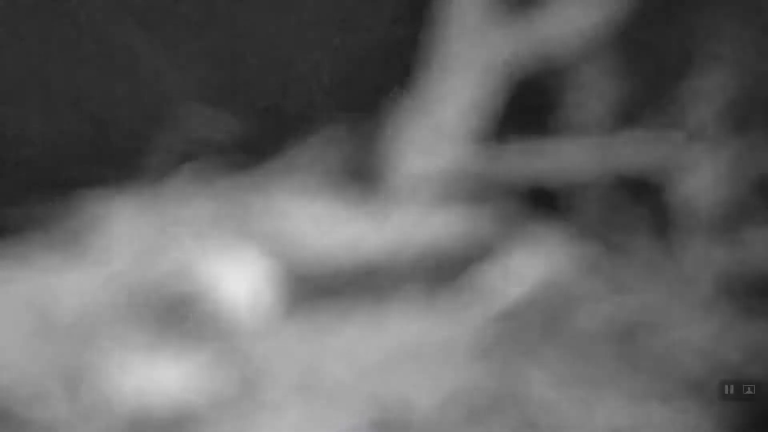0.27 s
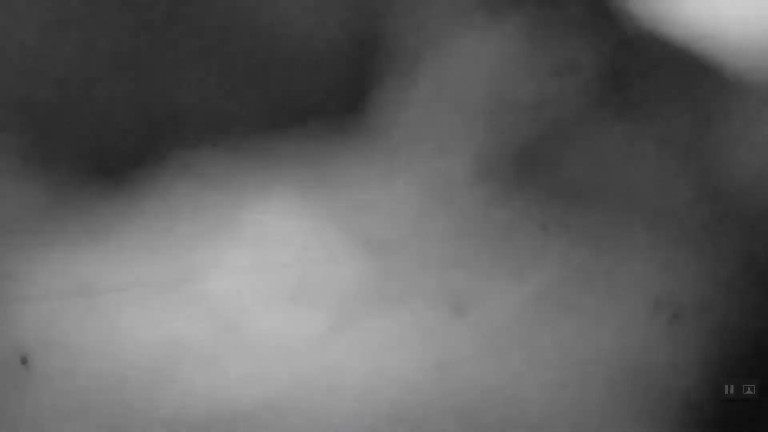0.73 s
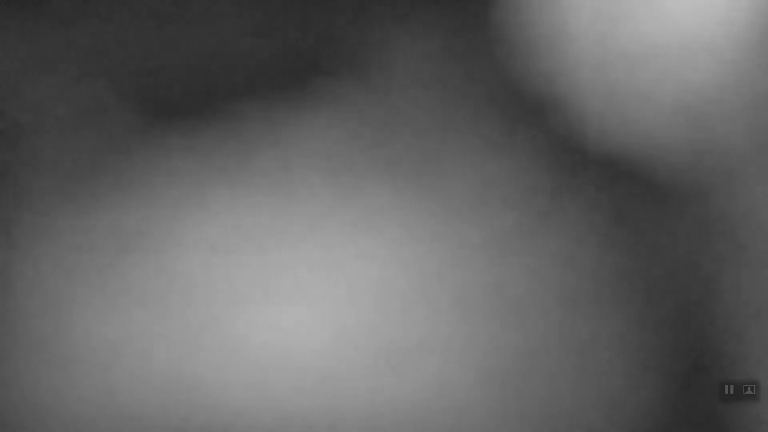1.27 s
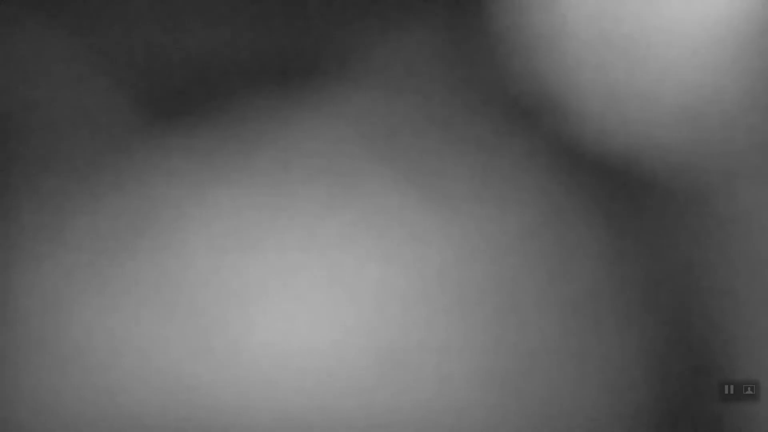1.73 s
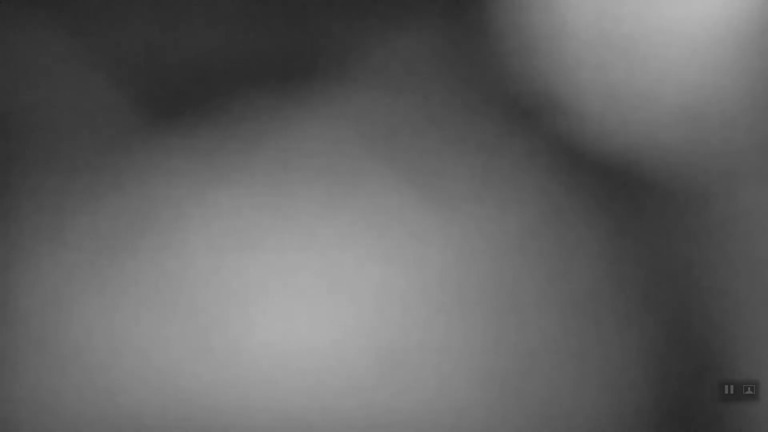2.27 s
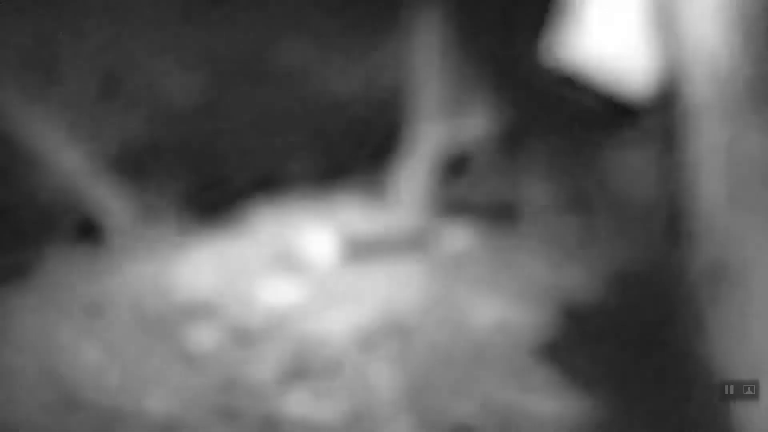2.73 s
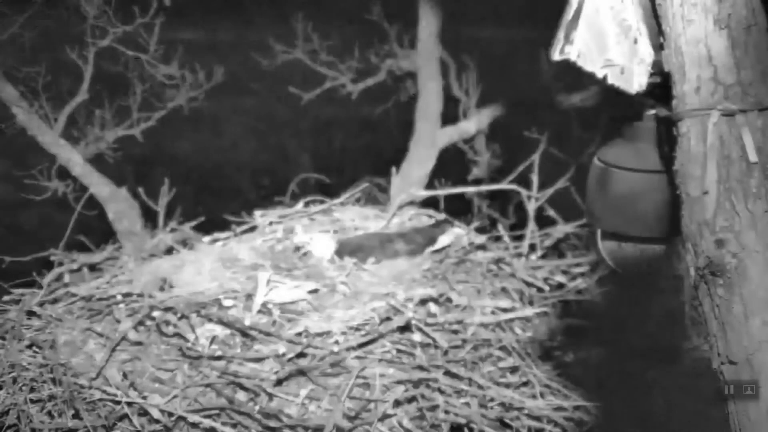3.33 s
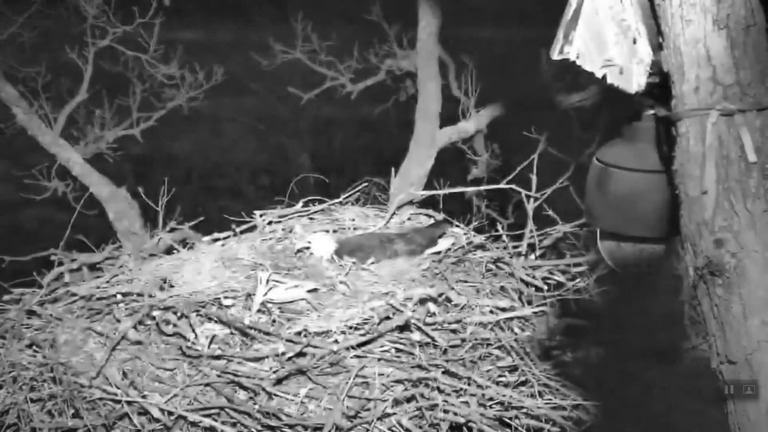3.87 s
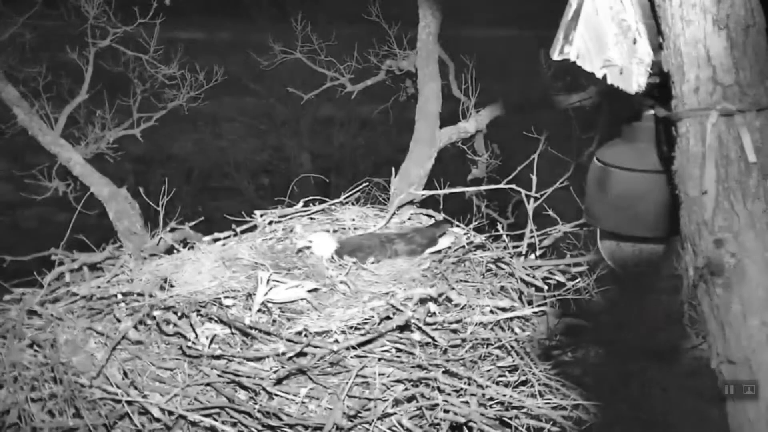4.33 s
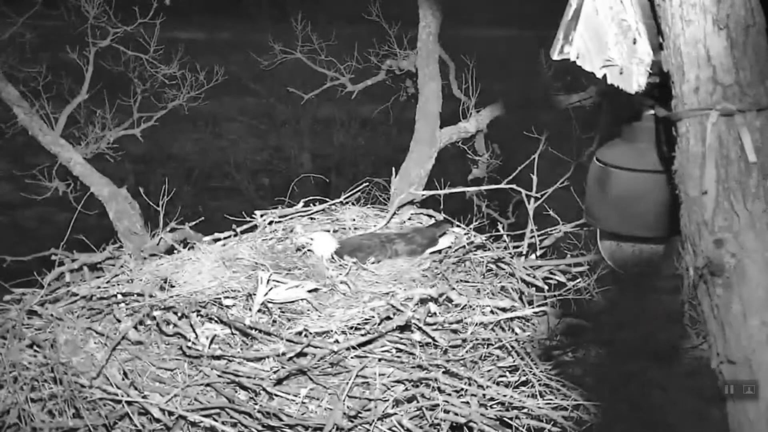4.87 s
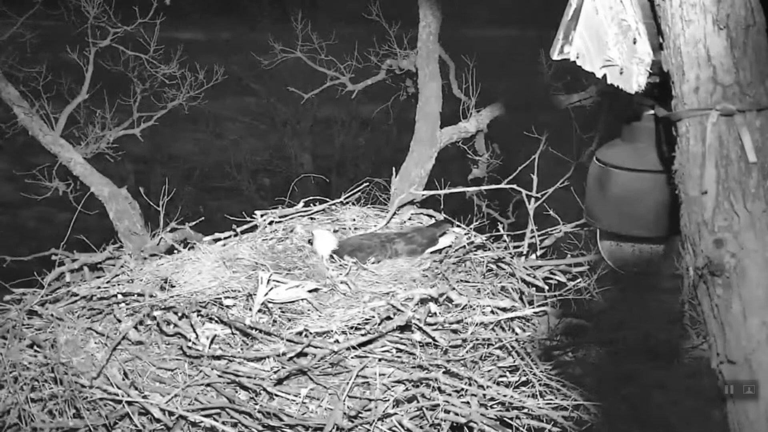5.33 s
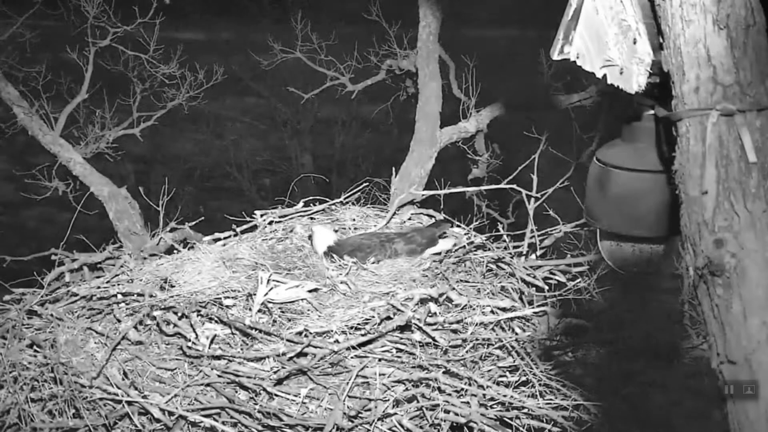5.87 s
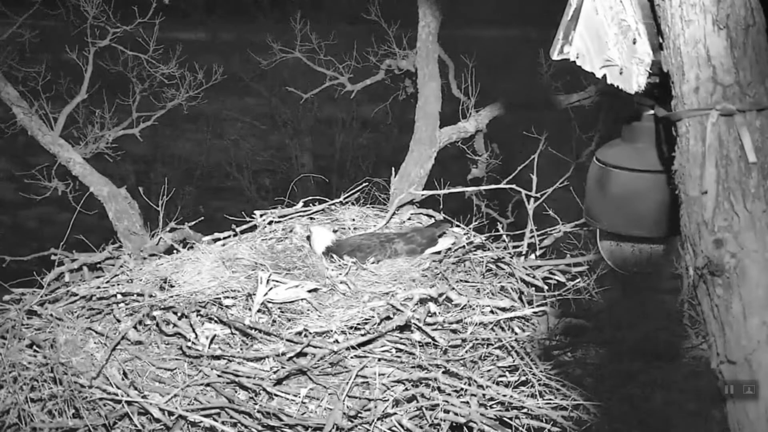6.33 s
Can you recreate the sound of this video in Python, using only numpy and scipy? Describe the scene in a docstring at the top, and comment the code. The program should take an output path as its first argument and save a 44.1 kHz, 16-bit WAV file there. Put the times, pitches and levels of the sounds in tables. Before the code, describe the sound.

A bald eagle squeals hoarsely and gives two bouts of rapid high chittering at night, over a low throbbing hum.

```python
"""Hoarse squeals, then two bouts of rapid notes that sink and fade: an eagle chitters at night near a nest camera.
Most notes are a short falling squeak that breaks into a held, reedy tone, built from shaky harmonics and airy noise.
Faint whistles are pure gliding tones; nest knocks and higher beak or throat clicks are dying rings with a crack.
The trees echo the calls through a few delays and a scattered tail.
Under it all a low machine hum throbs, made of steady tones, over a soft rumble and microphone hiss of shaped noise."""
import sys
import numpy as np
from scipy import signal
from scipy.fft import rfft, irfft
from scipy.io import wavfile
from scipy.ndimage import map_coordinates

SR = 44100
rng = np.random.default_rng(int(sys.argv[2]) if len(sys.argv) > 2 else 0)


def to_wav(sig):
    """Store sig (one row per channel, or 1-D mono) as 16-bit WAV at the path in sys.argv[1].

    Samples outside -1..1 are clipped; the rate is SR.
    """
    pcm = np.clip(np.atleast_2d(sig), -1, 1) * 32767
    pcm = np.round(pcm).astype(np.int16)
    wavfile.write(sys.argv[1], SR, pcm.T)  # frames by channels


N = 291501  # length of the scene in samples

CHITTER_ARCH = .022  # both ends of a held note lie this share of its pitch below the middle


def eagle():
    """All the bird's calls, each sung by the syrinx, its voice organ."""
    return squeals() + chitters() + double_notes() + short_calls()


def chitters():
    """Each note drops in with a squeak and settles on a held, reedy tone."""
    # held notes: (start t/s, length t/s, attack t/s, pitch f/Hz, fall as a share of pitch, level/dB,
    # fade in dB per s, 2nd harmonic level/dB, 3rd harmonic level/dB, squeak level/dB)
    held_notes = [ (3.005, .060, .018, 3025, -.004, -25, 140, -18, -11, -58),
                  (3.231, 0.052, .0045, 3025, .05, -26.3, 15, -10.5, -14.5, -35.5),
                  (3.354, .042, .005, 3015, 0.031, -26.7, 15, -9.5, -21, -37.5),
                  (3.490, .036, .005, 2925, 0.048, -31, 70, -6.5, -26, -49),
                  (3.798, .016, .005, 2015, 0.054, -34, 20, -9, -24, -66),
                  (5.900, .037, .005, 2740, 0.021, -44, -60, -1, -7.5, -49.5),
                  (6.022, 0.03, .005, 2680, 0.0056, -45, 200, 0.5, -13, -61),
                  (6.155, .040, .010, 2640, 0.035, -61.5, 20, -11, -13, -65.5)]
    squeak_lead_s = .0105
    out = np.zeros(N)
    for start, length, attack, hz, fall, db, fade, second_db, third_db, squeak_db in held_notes:
        add(out, start - squeak_lead_s, undb(squeak_db) * squeak(hz))
        held = note(length, hz, fall, CHITTER_ARCH, second_db, third_db, roughness(db),
                    fade_db_per_s=fade, attack=attack)
        add(out, start, undb(db) * held)
    return out


def double_notes():
    """After the squeak a high voice sounds and a low one joins; together they make tones at sums of their pitches."""
    # notes sung on both sides of the syrinx: (start t/s, length t/s, low voice f/Hz, fall as a share of pitch,
    # low voice level/dB, high voice f/Hz, high voice length t/s, high voice level/dB,
    # 2nd harmonic level/dB, sum tone level/dB, squeak level/dB)
    voice_pairs = [ (3.113, 0.051, 3070, 0.065, -25, 3723, .012, -23, -11, -41, -33.5),
                   (3.630, 0.041, 2090, .16, -33.5, 2785, 0.012, -37.5, -14.5, -48, -40.5),
                   (5.455, 0.054, 2960, 0.014, -47, 3490, .048, -40.5, -7, -38.5, -66),
                   (5.556, 0.05, 2900, 0.017, -54, 3535, .046, -32, -4.5, -50, -37.5),
                   (5.665, 0.072, 2790, .04, -54.5, 3533, .037, -31.5, -8, -47, -40.5),
                   (5.777, 0.056, 2825, 0.037, -44, 3400, 0.018, -44.5, 0.5, -45, -45)]
    squeak_lead_s, low_lag_s = .0125, .0055  # the low voice joins late
    high_fall, high_rough = .01, .36  # share of pitch; roughness
    first_pulse_gap_s, pulse_gap_every_s, gap_depth = .016, .0214, .83
    upper_sum_db = -10  # upper sum tones, relative to the first
    out = np.zeros(N)
    for (start, length, low_hz, fall, low_db, high_hz, high_s, high_db,
         second_db, sum_db, squeak_db) in voice_pairs:
        third_db = second_db - 5.5
        low = note(length - low_lag_s, low_hz, fall, CHITTER_ARCH, second_db, third_db,
                   roughness(low_db), fade_db_per_s=15)
        high = note(high_s, high_hz, high_fall, 0, second_db, third_db=-18, rough=high_rough,
                    tremor_db=2.0, fade_db_per_s=5)
        both = note(high_s, low_hz + high_hz, high_fall, 0, second_db=-22, third_db=-30, rough=.4,
                    fade_db_per_s=150)
        for hz in (2 * low_hz + high_hz, low_hz + 2 * high_hz):
            upper = note(high_s, hz, high_fall, 0, second_db=-30, third_db=-30.5, rough=.4)
            both = both + undb(upper_sum_db) * upper
        add(out, start - squeak_lead_s, undb(squeak_db) * squeak(high_hz))
        # narrow dips break the high voice and the sum tones into short pulses
        t = np.arange(len(high)) / SR
        dips = np.cos(np.pi * (t - first_pulse_gap_s) / pulse_gap_every_s) ** 10
        chop = 1 - gap_depth * dips
        add(out, start, chop * (undb(high_db) * high + undb(sum_db) * both))
        add(out, start + low_lag_s, undb(low_db) * low)
    return out


def squeak(pitch):
    """The rough, steep drop into a note; its own pitch partly follows the pitch of that note."""
    usual_squeak_hz, usual_note_hz, follow = 4480, 3000, .6
    squeak_hz = usual_squeak_hz * (pitch / usual_note_hz) ** follow
    return note(.013, squeak_hz, fall=.35, arch=.02, second_db=-20.5, third_db=-25, rough=1.07)


def squeals():
    """A hoarse rising tone breaks into a higher, harsher one that sinks and fades."""
    # (start t/s, length t/s, pitch f/Hz, level/dB, break after t/s, length after the break t/s,
    # level after the break/dB)
    squeal_list = [(0.038, 0.0406, 4660, -40, .055, .080, -43.5),
                   (.358, .042, 4780, -45.5, .022, .055, -55)]
    rise, break_ratio, break_fall = .06, 1.295, .075  # rise and fall are shares of pitch
    scrape_s, scrape_ratio, scrape_db = .034, .85, -10.5  # rough, lower end of the first tone
    out = np.zeros(N)
    for start, length, hz, db, break_s, harsh_s, harsh_db in squeal_list:
        first = note(length, hz, -rise, arch=0.016, second_db=-24, third_db=-26, rough=.48, attack=.009)
        add(out, start, undb(db) * first)
        harsh = note(harsh_s, break_ratio * hz, break_fall, arch=0.014, second_db=-15, third_db=-25,
                     rough=.75, fade_db_per_s=80)
        add(out, start + break_s, undb(harsh_db) * harsh)
        scrape = note(scrape_s, scrape_ratio * hz, 0, 0, second_db=-8, third_db=-16, rough=1.32)
        add(out, start + length, undb(db + scrape_db) * scrape)
    return out


def short_calls():
    """Brief rising or arched yelps early in a bout, falling high chips and low clucks, all syrinx notes."""
    # yelps: (start t/s, length t/s, pitch f/Hz, rise as a share of pitch, level/dB,
    # 2nd harmonic level/dB, roughness 0-1)
    yelp_list = [(2.986, 0.021, 4140, .03, -33.5, -19, 0.23), (3.071, .012, 4600, .22, -36, -12, 0.7),
                 (5.433, .026, 3690, .09, -48.5, -14, 0.63), (5.510, 0.0157, 4750, 0.2, -41, -6, 0.8)]
    # chips: (start t/s, length t/s, pitch f/Hz, level/dB)
    chip_list = [(1.775, .025, 3900, -55.5), (1.778, 0.025, 4640, -61), (1.886, 0.011, 4550, -47),
                 (1.893, .009, 3940, -48), (1.901, 0.013, 3895, -38.5), (2.025, .009, 3700, -61),
                 (3.737, .014, 4400, -40), (3.749, 0.013, 3820, -38), (3.865, 0.012, 4270, -56)]
    # clucks: (start t/s, length t/s, pitch f/Hz, level/dB, 2nd harmonic level/dB, 3rd harmonic level/dB)
    cluck_list = [(0.055, 0.018, 1810, -48, -22, -29), (.061, 0.022, 1273, -44.5, -5, -2.5),
                  (0.092, .040, 815, -40.5, -27, -10), (3.516, .019, 2040, -45, -19, -21),
                  (3.973, .023, 1284, -48.5, 0.5, -14), (4.127, 0.0247, 1188, -49, -2, -24),
                  (4.447, 0.014, 1660, -55, -24, -26), (6.308, .008, 2380, -67, 1, -12)]
    out = np.zeros(N)
    for start, length, hz, rise, db, second_db, rough in yelp_list:
        yelp = note(length, hz, -rise, arch=.11, second_db=second_db, third_db=-25, rough=rough)
        add(out, start, undb(db) * yelp)
    for start, length, hz, db in chip_list:
        chip = note(length, hz, fall=.065, arch=0, second_db=-23.5, third_db=-30, rough=.4)
        add(out, start, undb(db) * chip)
    for start, length, hz, db, second_db, third_db in cluck_list:
        cluck = note(length, hz, fall=.145, arch=0, second_db=second_db, third_db=third_db, rough=.56)
        add(out, start, undb(db) * cluck)
    return out


def roughness(db):
    """The less force behind a note, the less steadily the syrinx vibrates."""
    loud_rough, rough_per_db, loud_db = .21, .012, -25.5
    return np.clip(loud_rough + rough_per_db * (loud_db - db), .05, 1)


def note(length, pitch, fall, arch, second_db, third_db, rough, side_ratio=1.3, coupling=0.087,
         tremor_hz=56, tremor_db=1.0, tremor_lag=.0025, follow=.45, fade_db_per_s=40, dulling=1.6,
         attack=.0053, waver=.003):
    """One syrinx note: a harmonic tone whose pitch and strength shake with roughness, with a rasp of air."""
    # colour of the airy noise: (f/Hz, relative level/dB)
    rasp_shape = [(500, -3), (1500, -6.5), (3000, -2), (5500, -11.5), (8000, -5.5), (12000, -10.5),
                  (16000, -22)]
    t, hz, envelope = glide(length, pitch, fall, arch, attack=attack, release=min(.009, 0.3 * length))
    rough_jitter = rough ** 1.45 * (.06 * wobble(t, 1496) + .014 * wobble(t, 220))
    jitter = rough_jitter + waver * wobble(t, 70)
    phase = 2 * np.pi * np.cumsum(hz * (1 + jitter)) / SR
    # the other side of the syrinx buzzes at 1.3 times the pitch and bends the wave: out-of-tune side tones
    side = side_ratio * phase + rng.uniform(0, 2 * np.pi)
    buzz = sum(np.sin(k * side) / k for k in range(1, 4))
    phase = phase + coupling * undb(3.3 * wobble(t, 110)) * buzz
    # the air pressure trembles, which the overtones follow far more than the fundamental
    tremor = tremor_db * np.sin(2 * np.pi * tremor_hz * (t - tremor_lag))
    # as the pressure runs out the note weakens, and its high overtones give way to the 2nd
    fade = fade_db_per_s * (t - length / 2)
    envelope = envelope * undb(-fade)
    dull = dulling * fade
    upper_db = -22.5 + 0.21 * (second_db + third_db)  # 4th and 5th harmonics
    tone = undb(1.1 * wobble(t, 131.5) + follow * tremor) * np.sin(phase)
    for k, db in enumerate([second_db, third_db, upper_db, upper_db], start=2):
        tilt = dull if k == 2 else -dull
        strength = undb(db + tremor + tilt + 3.02 * wobble(t, 130))
        below_limit = k * hz < SR / 2  # leave out pitches too high for the sample rate
        tone += strength * np.sin(k * phase) * below_limit
    shake = 1 + rough * (0.4 * wobble(t, 498) + 0.22 * wobble(t, 2400))
    # the air leaves in tiny uneven spurts
    spurts = undb(3 * wobble(t, 700))
    rasp = (undb(-37) + rough * undb(-16)) * spurts * noise(rasp_shape, size=8192)[:len(t)]
    return envelope * (tone * shake + rasp)


def glide(length, pitch, fall, arch, attack, release):
    """Time, falling arched pitch and soft-edged envelope of one note."""
    t = np.arange(int(length * SR)) / SR
    u = t / length - .5  # from -0.5 at the start to 0.5 at the end
    hz = pitch * (1 - fall * u - arch * (2 * u) ** 2)
    edges = np.clip(t / attack, 0, 1) * np.clip((length - t) / release, 0, 1)
    return t, hz, np.sin(np.pi / 2 * edges) ** 2


def whistles():
    """Thin, faint slurs: single gliding sine waves with soft edges."""
    # (start t/s, length t/s, pitch f/Hz, fall as a share of pitch, peak level/dB)
    whistle_list = [(.785, .035, 4580, 0.042, -78), (1.344, 0.068, 4400, 0.069, -68.5),
                    (2.076, 0.06, 4300, .09, -69), (4.76, 0.021, 4570, .055, -68.5),
                    (4.782, .098, 4190, -.035, -73)]
    out = np.zeros(N)
    for start, length, pitch, fall, db in whistle_list:
        t, hz, envelope = glide(length, pitch, fall, arch=-.01, attack=.008, release=0.01)
        tone = np.sin(2 * np.pi * np.cumsum(hz) / SR)
        add(out, start, undb(db) * envelope * tone)
    return out


def knocks_and_clicks(crack_t60=0.12, contact=0.0028):
    """Nest knocks, some bouncing in a rattle, and higher beak or throat clicks: damped rings under a brief crack."""
    # (start t/s, thud level/dB, crack level/dB, ring pitch ratio, rattle length t/s)
    knock_list = [(.185, -27.5, -44, 0.836, .005), (0.447, -26.5, -41.5, 0.92, .015),
                  (1.877, -38.5, -44, 2.32, 0.013), (2.020, -44.5, -47, 2, .005),
                  (3.101, -36.5, -39.5, 1.64, .005), (3.433, -29.5, -50, 1.05, .064),
                  (3.613, -41.5, -55, 2.1, .005), (3.732, -43, -55, 2.33, .005),
                  (3.857, -41.5, -54, 2.05, .005), (5.545, -32, -41, 1.28, .005)]
    # ring of the nest, pitched up for the clicks: (f/Hz before the pitch ratio, level/dB,
    # time to fall by 60 dB t/s)
    nest_modes = [(155.7, -3.5, 0.14), (259, 4.5, 0.043), (342, 3, 0.024), (520, 1.5, 0.022),
                  (750, -11, 0.0196)]
    # colour of the crack: (f/Hz, relative level/dB)
    crack_shape = [(300, 8.5), (1200, -8.5), (2500, -14), (6000, -34), (16000, -21)]
    bounce_s, rattle_fade_db = .0131, 11.5  # gap between bounces; loss by the end of a rattle
    out = np.zeros(N)
    t = np.arange(SR // 10) / SR
    push = np.clip(t / contact, 0, 1)  # the blow builds up softly, as when a springy nest gives way
    for start, thud_db, crack_db, ratio, rattle_s in knock_list:
        for delay in np.arange(0, rattle_s, bounce_s):
            detune = ratio * (1 + 0.092 * rng.standard_normal(len(nest_modes)))
            thud = np.zeros(len(t))
            for (hz, db, t60), pitch_ratio in zip(nest_modes, detune):
                thud += undb(db - 60 * t / t60) * np.sin(2 * np.pi * hz * pitch_ratio * t)
            crack = noise(crack_shape, len(t)) * np.exp(-np.log(1000) * t / crack_t60)
            strength = undb(-rattle_fade_db * (delay / rattle_s) ** 2)
            knock = undb(thud_db) * thud + undb(crack_db) * crack
            add(out, start + delay, strength * push * knock)
    return out


def trees(x, wet_db=-18, t60=0.85, low_hz=4300, high_hz=8500, flicker_db=3, flicker_rate=45,
          sway_s=.00003, sway_rate=25):
    """Close reflections, then a thin scatter from the branches, mostly of short waves; the tail flickers as it dies."""
    # near reflections from trunk and nest, ahead of the final filter: (delay t/s, level/dB)
    echo_list = [(0.011, -16), (0.019, -10.5), (.036, -18), (.088, -42)]
    t = np.arange(SR // 2) / SR
    decay = np.exp(-np.log(1000) * t / t60)
    scatter = rng.standard_normal(len(t)) ** 3 * decay * np.clip(t / .015, 0, 1)  # cubing makes it sparse
    tail = signal.fftconvolve(x, undb(wet_db) * scatter / np.linalg.norm(scatter))[:N]
    now = np.arange(N) / SR
    swaying_time = now + sway_s * wobble(now, sway_rate)
    out = map_coordinates(tail, [swaying_time * SR]) * undb(flicker_db * wobble(now, flicker_rate))
    for delay, db in echo_list:
        add(out, delay, undb(db) * x)
    return signal.sosfilt(signal.butter(1, [low_hz, high_hz], "bandpass", fs=SR, output="sos"), out)


def background(night_db=-45.0, sway_db=0.2):
    """Steady machine tones over a gently swaying rumble and even hiss; the upper two beat about 8 times a second."""
    # pitches of the hum tones: (f/Hz)
    hum_pitches = (71.5, 95.87, 103.71)
    # peaks of the same tones: (level/dB)
    hum_levels = (-56.5, -35.5, -44.5)
    # colour of the rumble and hiss: (f/Hz, relative level/dB)
    night_shape = [(25, -10), (65, 3.5), (130, 1.5), (250, -1), (450, -2.5), (700, -11), (1100, -22),
                   (1800, -37.5), (3000, -41.5), (5000, -43), (8000, -39), (11000, -36), (16000, -37)]
    t = np.arange(N) / SR
    hum = sum(undb(db) * np.sin(2 * np.pi * hz * t) for hz, db in zip(hum_pitches, hum_levels))
    air = noise(night_shape, N)
    rumble = signal.sosfilt(signal.butter(1, 1200, fs=SR, output="sos"), air)
    sway = undb(sway_db * wobble(t, 11)) - 1
    return hum + undb(night_db) * (air + rumble * sway)


def undb(db):
    """Decibels to gain."""
    return 10 ** (np.asarray(db) / 20)


def noise(points, size):
    """Unit-rms noise with a spectrum given as (Hz, dB) points."""
    hz, db = np.transpose(points)
    freqs = np.maximum(np.arange(size // 2 + 1) * SR / size, 1)
    gain = undb(np.interp(np.log(freqs), np.log(hz), db))
    x = irfft(rfft(rng.standard_normal(size)) * gain, size)
    return x / x.std()


def wobble(t, rate):
    """Smooth random motion with a new value `rate` times a second."""
    values = rng.standard_normal(size=1024)
    return map_coordinates(values, [t * rate], order=3, mode="wrap")


def add(track, start, x):
    """Mix x into the track at a time in seconds."""
    i = max(int(start * SR), 0)
    track[i:i + len(x)] += x[:len(track) - i]


def scene():
    """The bird, the whistles and their echo, with knocks and clicks, above the night background."""
    calls = eagle() + whistles()
    return (calls + trees(calls) + knocks_and_clicks() + background())[None]


def record(dry):
    """The camera cuts the top: a steep filter removes the highest treble."""
    top_hz = 15900
    return signal.sosfilt(signal.ellip(10, .2, 80, top_hz, fs=SR, output="sos"), dry)


dry = scene()
out = record(dry)
to_wav(out)
```